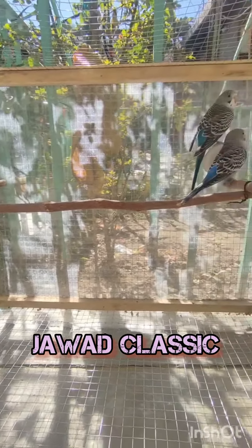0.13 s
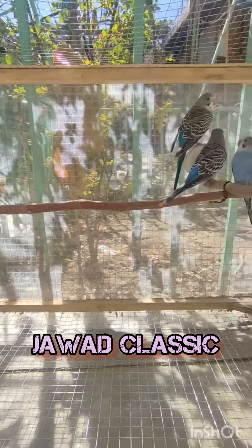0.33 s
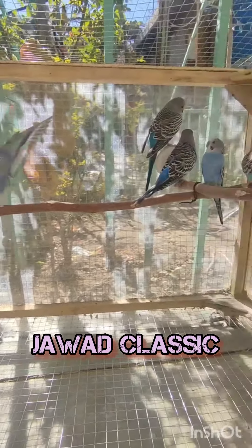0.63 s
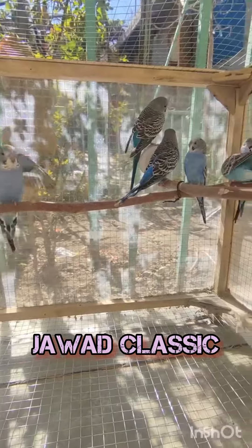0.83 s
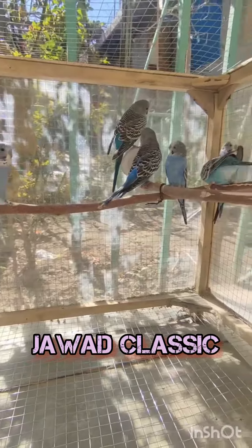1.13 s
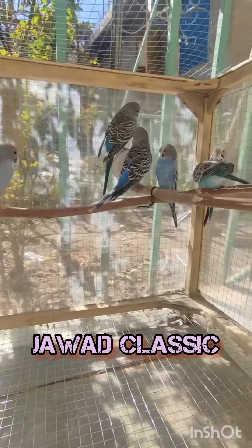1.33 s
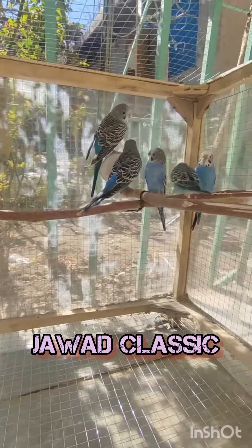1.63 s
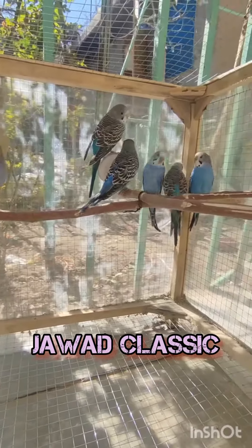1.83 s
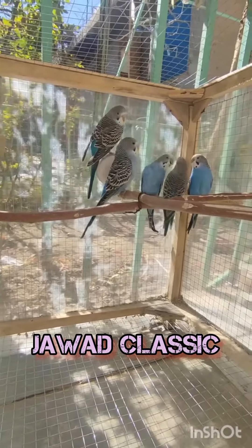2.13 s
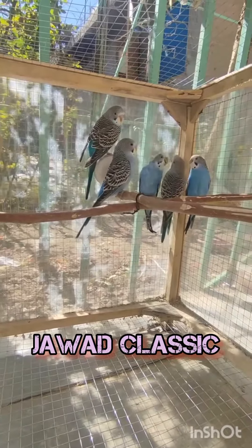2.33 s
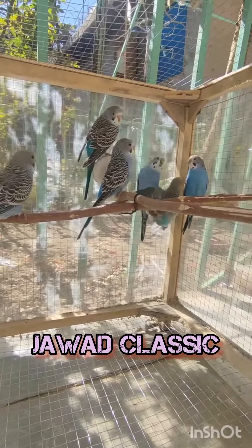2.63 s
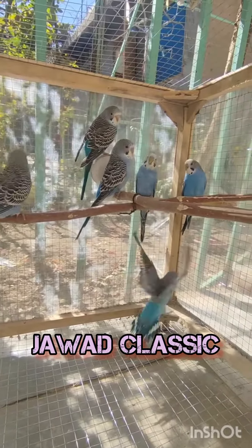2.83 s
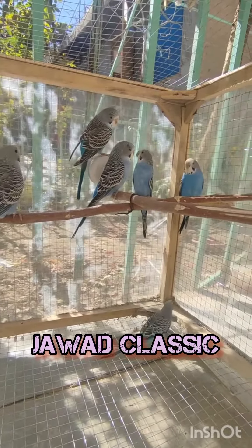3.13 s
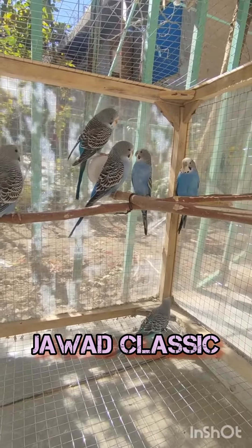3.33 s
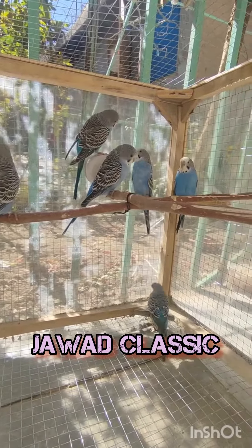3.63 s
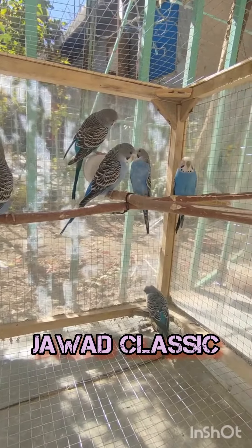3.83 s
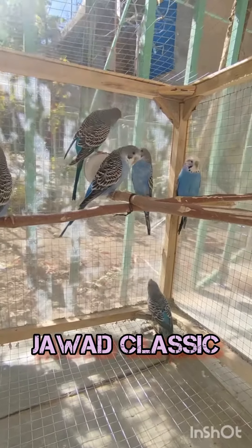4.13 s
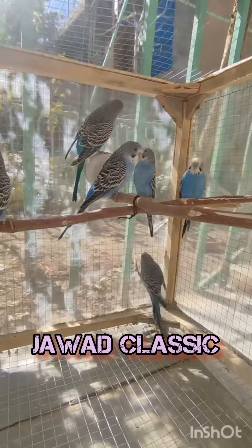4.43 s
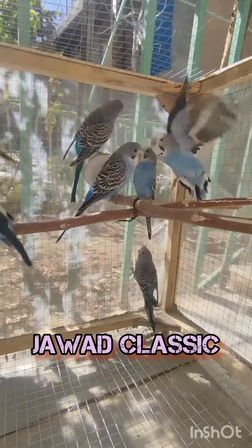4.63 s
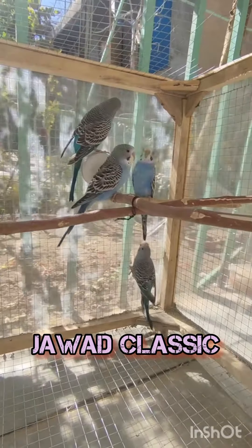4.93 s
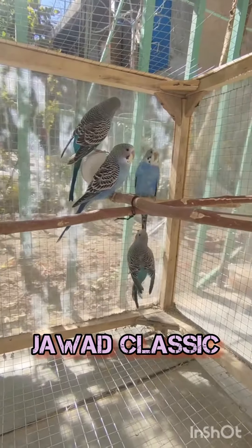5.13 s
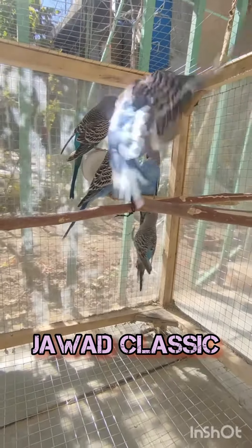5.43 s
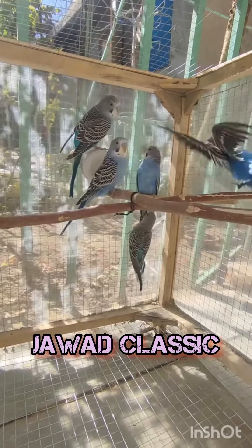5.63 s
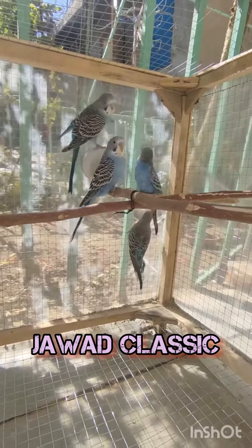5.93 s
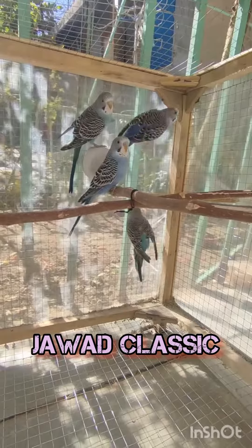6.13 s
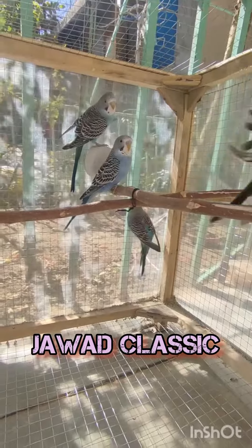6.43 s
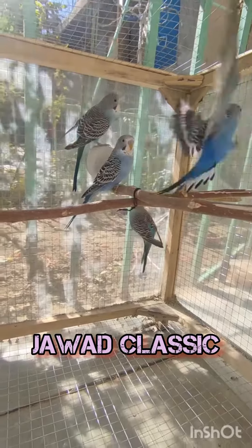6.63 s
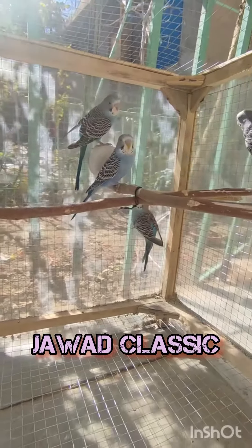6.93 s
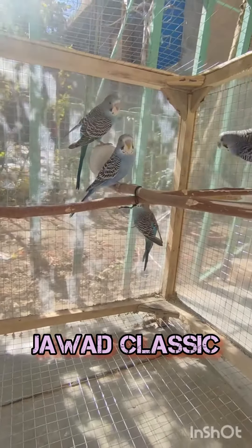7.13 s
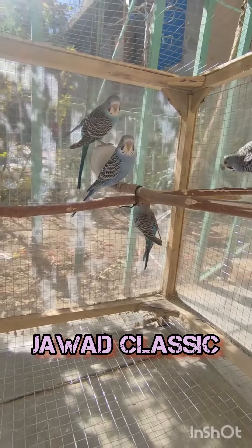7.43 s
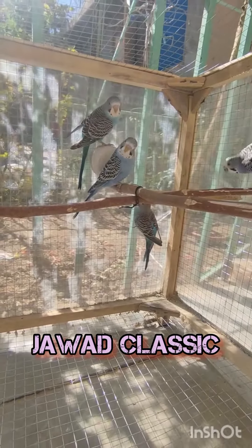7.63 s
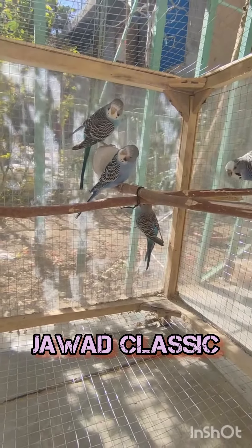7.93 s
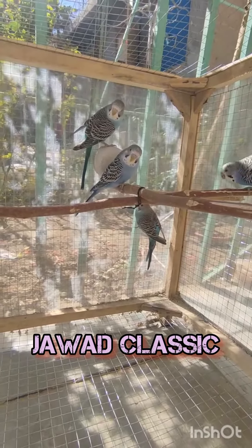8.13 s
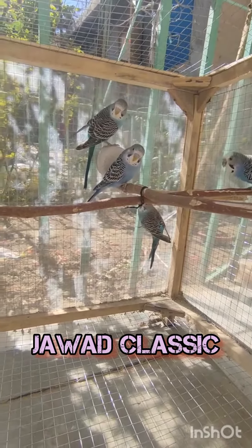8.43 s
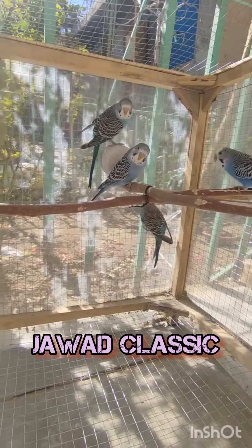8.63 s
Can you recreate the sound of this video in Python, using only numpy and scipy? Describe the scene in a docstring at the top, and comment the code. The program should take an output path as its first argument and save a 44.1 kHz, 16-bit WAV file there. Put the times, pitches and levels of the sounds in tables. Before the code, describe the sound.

Raspy squawks and quick rising chirps in a wire aviary give way to heavy wing flutter, buffeting thumps, mesh rattles and two faint bird whistles.

```python
"""Small parrots in an outdoor wire aviary, close to a phone with two microphones. Filtered noise and a 199 Hz
tone make a lasting hush and hum; bursts of crackle make claws and wings slap the mesh, at first sparsely.
Rasping squawks (pulsed resonances) and quick swept chirps (gliding tones) follow, then a dove's purring coos.
Wings and gusts then thump the microphones as smooth pulses amid gusty noise, strongest near 6 to 7 s.
A far bird gives two warbled whistles near the end, while feathers still rustle and the mesh rattles."""
import sys
import numpy as np
from scipy import signal
from scipy.fft import rfft, irfft, next_fast_len
from scipy.io import wavfile
from scipy.ndimage import uniform_filter1d, map_coordinates

SR = 44100
rng = np.random.default_rng(int(sys.argv[2]) if len(sys.argv) > 2 else 0)


def master(y):
    """Save y as 16-bit WAV."""
    cut = np.clip(np.atleast_2d(y).T, -1, 1)
    pcm = np.round(cut * 32767)  # scale
    wavfile.write(sys.argv[1], SR, pcm.astype(np.int16))


N = 386757

# Noise spectrum of low wing flutter. Each row: frequency in Hz, relative density in dB.
FLUTTER_SPECTRUM = [(120, -7), (200, -1.5), (253, -2), (286, -9), (430, -9), (588, -6.5), (1600, -13),
                    (2080, -52.5), (3520, -120)]
# Noise spectrum of coarse rustle and crackle. Each row: frequency in Hz, relative density in dB.
RUSTLE_SPECTRUM = [(710, -4), (1200, -8.5), (1410, -8.5), (1780, 0), (3430, -1), (4990, -4), (6460, -2.5),
                   (7260, 2), (8800, -17), (11400, -40.5), (19400, -120)]
# Noise spectrum of fine treble hiss. Each row: frequency in Hz, relative density in dB.
FINE_SPECTRUM = [(4940, -32.5), (8400, 2.5), (9690, -3), (11400, 2), (14600, 4), (15600, -4), (16000, -34)]
# Broad noise spectrum of a rasping voice. Each row: frequency in Hz, relative density in dB.
RASP_SPECTRUM = [(710, -79), (1200, -93.5), (1570, -26), (2880, -1), (3160, 1), (3940, 4.5), (5430, -8.5),
                 (5900, -33), (7480, 7.5), (9000, 3), (11700, -53), (19800, -120)]
VOICE_TOP_HZ = 8170


def amp(db):
    """Decibel law: the amplitude gain of a level in dB."""
    return 10 ** (np.asarray(db) / 20)


def unit(x):
    """Normalization of power: x scaled to rms 1."""
    return x / np.sqrt(np.mean(np.abs(x) ** 2) + 1e-20)


def along(points, hz):
    """Logarithmic frequency scale: (Hz, value) points interpolated on it."""
    f, v = np.transpose(points)
    return np.interp(np.log(hz + 1), np.log(f + 1), v)


def curves(rows):
    """Piecewise linear envelopes: one per column, sampled from the first row's time to the last."""
    s, *cols = np.transpose(rows)
    t = np.arange(s[0] * SR, s[-1] * SR) / SR
    return [np.interp(t, s, c) for c in cols]


def wobble(rate, size):
    """Band-limited random modulation: a smooth curve through rate Gaussian knots a second."""
    knots = rng.standard_normal(int(size * rate / SR) + 4)
    return map_coordinates(knots, [np.arange(size) * rate / SR])


def filtered(x, response):
    """Linear filtering: the spectrum of x times a response of frequency."""
    m = next_fast_len(x.shape[-1] + 4096)
    return irfft(rfft(x, m) * response(np.fft.rfftfreq(m, 1 / SR)), m)[..., :x.shape[-1]]


def coloured(x, spectrum):
    """Spectral shaping: x filtered by the given spectrum, at rms 1."""
    return unit(filtered(x, lambda hz: amp(along(spectrum, hz))))


def rush(spectrum, alike, patchy_db):
    """Partly coherent stereo noise: mid and side shares set the likeness of the ears; gain varies in patches."""
    z = signal.stft(rng.standard_normal((2, N + 512)), nperseg=512)[2]
    field = uniform_filter1d(rng.standard_normal(z.shape[1:]), 6, 0)
    field = unit(uniform_filter1d(field, 8, 1))
    pair = signal.istft(z * amp(patchy_db * field), nperseg=512)[1][:, :N]

    def mid_side(hz):
        turn = np.arccos(np.clip(along(alike, hz), -1, 1)) / 2
        return amp(along(spectrum, hz)) * [np.cos(turn), np.sin(turn)]

    mid, side = filtered(pair, mid_side)
    return unit(np.array([mid + side, mid - side]))


def add(out, s, x, pan_db, wet_db, t60, lag=8):
    """Interaural delay and scattering: the right side lags by samples; frame and ground scatter to each apart."""
    t = np.arange(SR // 5) / SR
    decay = amp(-60 * t / t60) + amp(-19.5 - 60 * t / 0.15)  # near mesh, then the yard
    paths = rng.standard_normal((2, len(t))) * decay
    paths *= amp(wet_db) / np.linalg.norm(paths, axis=1, keepdims=True)
    paths[[0, 1], [0, lag]] += 1  # direct sound
    sides = amp([pan_db / 2, -pan_db / 2])[:, None]
    ears = signal.fftconvolve(x[None], paths, axes=1) * sides
    seat = out[:, round(s * SR):][:, :ears.shape[1]]
    seat += ears[:, :seat.shape[1]]


def fade(size, edge):
    """Trapezoidal window: linear ends of edge seconds avoid clicks."""
    k = np.arange(size)
    return np.clip(np.minimum(k, size - k) / (edge * SR), 0, 1)


def ringing(pulses, hz, width_hz):
    """Resonance: two equal poles ring at each pulse, carried to a moving centre frequency, at rms 1."""
    decay = np.exp(-np.pi * width_hz / SR)
    swing = signal.lfilter([1], [1, -decay], pulses)
    swing = signal.lfilter([1], [1, -decay], swing)
    return unit(np.real(swing * np.exp(2j * np.pi * np.cumsum(hz) / SR)))


def background():
    """Diffuse field and steady tone: shaped outdoor noise with a slightly unsteady electric hum."""
    # Each row: frequency in Hz, relative density in dB.
    hush_spectrum = [(15, -31), (30, 1), (60, 2), (110, 3.5), (160, -1.5), (250, -9.5), (420, -17),
                     (800, -18), (1200, -26), (1940, -23.5), (4000, -24.5), (7500, -33), (9000, -48),
                     (13000, -34), (16000, -45.5)]
    # Each row: frequency in Hz, left-right likeness from -1 to 1.
    hush_alike = [(60, 1), (290, 1), (640, .5), (1400, 0.27), (9000, 0.053)]
    hum_hz, hum_db, hush_db = 199, -54, -56.5
    sway = wobble(4, N) / 3  # radians
    waver_db = wobble(5, N) * .7
    hum = amp(hum_db + waver_db) * np.sin(2 * np.pi * hum_hz * np.arange(N) / SR + sway)
    return hum + amp(hush_db) * rush(hush_spectrum, hush_alike, patchy_db=1.0)


def far_whistles():
    """Frequency modulation: two warbled whistles, each with a narrow noise band, blurred by distance."""
    # Two whistles. Each row: time in seconds, pitch in Hz, level in dB, warble depth in Hz.
    songs = [
        [(6.95, 1794, -47, 40), (6.99, 2010, -47, 34), (7.012, 2060, -44, 30), (7.03, 2380, -39, 30),
         (7.06, 2430, -40, 30), (7.09, 2375, -39, 20), (7.125, 2420, -43, 20), (7.145, 2400, -38, 30),
         (7.175, 2430, -43.5, 40), (7.2, 2420, -54, 40), (7.27, 2380, -62, 40)],
        [(7.6525, 1588, -64, 150), (7.7, 1656, -58, 170), (7.76, 1700, -53, 199), (7.8, 1697, -52, 190),
         (7.86, 1750, -52, 150), (7.92, 1910, -50, 50), (8.01, 1910, -56, 50)],
    ]
    warble_hz, tremble_hz = 33.3, 30  # rate of the warble; size of the random tremble
    out = np.zeros((2, N))
    for rows in songs:
        hz, db, depth_hz = curves(rows)
        size = len(hz)
        warble = depth_hz * np.sin(2 * np.pi * warble_hz * np.arange(size) / SR)
        hz = hz + warble + tremble_hz * wobble(200.0, size)
        tone = np.sin(2 * np.pi * np.cumsum(hz) / SR)
        tone += .7 * ringing(rng.standard_normal(size) + 0j, hz, 300)
        tone *= amp(db + 2.5 * wobble(90, size))
        add(out, rows[0][0], tone, 0, wet_db=-1.5, t60=.09)
    return out


def dove():
    """Amplitude modulation: a nearly pure tone, purring as its pitch rises and falls, makes each hollow coo."""
    # Each row: start in seconds, length in seconds, start pitch in Hz, top pitch in Hz, end pitch in Hz,
    # share of the length before the top, level in dB.
    notes = [(3.48, 0.053, 458, 493, 470, 0.41, -57), (3.708, 0.18, 501, 584, 502, 0.71, -50),
             (4.013, 0.14, 553, 632, 520, 0.63, -48), (4.28, 0.127, 547, 610, 508, 0.5, -47),
             (4.469, 0.082, 555, 562, 484, 0.62, -46.5)]
    purr_hz, purr_db = 22.7, 2.5
    out = np.zeros((2, N))
    for s, length, start_hz, top_hz, end_hz, peak, db in notes:
        top_s = np.clip(peak, .1, .9) * length
        [pitch] = curves([(0, start_hz), (top_s, top_hz), (length, end_hz)])
        size = len(pitch)
        pitch = pitch + 10 * wobble(50.0, size)
        purr = purr_db * np.cos(2 * np.pi * purr_hz * np.arange(size) / SR)
        note = amp(db + purr) * np.sin(2 * np.pi * np.cumsum(pitch) / SR)
        add(out, s, note * fade(size, edge=.006), 0, wet_db=-1, t60=.35)
    return out


def flight():
    """Turbulence and friction: stirred air and rustling feathers are noises throbbing with an uneven wing beat."""
    # Each row: frequency in Hz, relative density in dB.
    draught_spectrum = [(12, -23.5), (20, 10), (52, 1), (182, -13), (221, -28.5), (253, -33), (300, -26.5),
                        (390, -64), (660, -120)]
    # Air stirred at the phone. Each row: time in seconds, level in dB before a common 1 dB rise.
    draught_level = [(0, -63), (.61, -69), (.71, -58), (.8, -61), (1.3, -62), (2.5, -60.5), (2.75, -47),
                     (2.98, -46), (3.15, -52), (3.6, -61), (4.6, -63), (4.72, -37.5), (5.02, -34),
                     (5.12, -44.5), (5.3, -37.5), (5.56, -38.5), (5.66, -45), (5.9, -31.5), (6.04, -31),
                     (6.09, -25), (6.18, -29.5), (6.27, -37.5), (6.4, -29), (6.55, -29), (6.64, -33),
                     (6.8, -27.5), (6.95, -40), (7.07, -53), (8.77, -49.5)]
    # Low flutter of the wings. Each row: time in seconds, level in dB.
    flutter_level = [(0, -75), (.61, -69), (.72, -55), (.93, -61.5), (1.02, -74), (1.4, -67), (1.48, -54.5),
                     (1.56, -66.5), (2.5, -65.5), (2.73, -53), (2.91, -42.5), (3.1, -60.5), (3.4, -68),
                     (3.74, -62), (3.85, -59.5), (4.58, -64.5), (4.76, -47.5), (4.97, -46.5), (5.1, -47),
                     (5.16, -54), (5.25, -40.5), (5.42, -54), (5.68, -46.5), (5.88, -48), (5.94, -36),
                     (6.03, -41.5), (6.1, -35.5), (6.18, -37), (6.28, -47), (6.47, -36.5), (6.64, -45),
                     (6.71, -38.5), (7.0, -49), (7.12, -49), (7.3, -60.5), (7.79, -65), (7.94, -47),
                     (8.13, -53.5), (8.77, -64)]
    # How busy the feathers are. Each row: time in seconds, base level in dB, extra coarse rustle in dB.
    feathers = [(0, -87, 10.5), (.33, -84.5, 12), (.6, -73, 3), (.78, -73, 4.5), (.95, -78.5, 7),
                (1.0, -98, 2.5), (1.12, -76, -5), (1.34, -103, 9), (1.45, -75, 0), (1.5, -73.5, -1),
                (1.73, -69.5, 1), (2.02, -87, 4), (2.14, -72.5, 1), (2.35, -75.5, 2.5), (2.55, -75, -41),
                (2.62, -55, -2), (2.76, -57, -4.5), (2.81, -44.5, -6.5), (2.93, -48.5, -3.5),
                (3.03, -71, 3), (3.14, -78, 1.5), (3.28, -65.5, -8), (3.48, -77, 8.5), (3.72, -63, -2.5),
                (3.82, -80, 8), (4.35, -88, 12), (4.58, -66.5, -6), (4.78, -58.5, 1), (5.1, -62.5, 2),
                (5.16, -64, 3), (5.26, -55.5, -0.5), (5.55, -68, 1.5), (5.76, -52, -1.5),
                (5.86, -56.5, -0.5), (5.96, -47, -1), (6.15, -55, -1.5), (6.48, -50.5, 3.5),
                (6.64, -55.5, 3.5), (6.81, -65, 2.5), (7.0, -61.5, 1), (7.11, -54.5, -3.5), (7.18, -66, 6),
                (7.28, -74, 1), (7.75, -72.5, -3.5), (7.87, -76, 5), (7.907, -59, 10), (8.02, -52.5, 4),
                (8.1, -63, 1), (8.25, -73, 0.5), (8.6, -78.5, -4), (8.77, -91, -17.5)]
    tables = (draught_level, flutter_level, feathers)
    levels = [np.resize(c, N) for rows in tables for c in curves(rows)]
    draught_db, flutter_db, feather_db, coarse_db = levels

    beat_hz = 22.44 * amp(wobble(8.6, N))
    beat_db = 0.6 * np.sin(2 * np.pi * np.cumsum(beat_hz) / SR)
    throb = wobble(38, N) + 0.32 * beat_db
    flick = wobble(22, N) + 0.33 * beat_db

    # each microphone port meets its own eddies
    eddies = amp(beat_db + 0.8 * np.array([wobble(20, N), wobble(20, N)]))
    air = rush(draught_spectrum, [(40, 0.5), (200, 0.1)], patchy_db=-0.1)
    draught = amp(draught_db + 1.0) * unit(eddies * air)

    air = rush(FLUTTER_SPECTRUM, [(250, 0.65), (600, 0.93), (1300, -0.49)], patchy_db=2.0)
    flutter = amp(flutter_db) * unit(amp(1.7 * throb + 2.23 * wobble(150, N)) * air)

    # single feathers snap past each other, 22 a second on average
    snaps = (rng.random(N) < 22 / SR) * rng.exponential(0.2, N)
    snaps = signal.lfilter([1], [1, -np.exp(-1 / (0.0059 * SR))], snaps)
    grain = amp(1.5 * throb + 1.8 * flick + 0.4 * wobble(500, N)) * (1 + snaps)
    coarse = rush(RUSTLE_SPECTRUM, [(1500, -0.088), (5000, -0.035)], patchy_db=3.0)
    rustle = amp(feather_db + 11 + coarse_db) * unit(grain * coarse)
    fine = rush(FINE_SPECTRUM, [(1000, 0.035)], patchy_db=4.0)
    return draught + flutter + rustle + amp(feather_db + 4.5) * unit(grain * fine)


def thumps():
    """Pressure pulse: strong wing strokes and a turbulent gust near 6.1 s thump the microphones briefly."""
    # Each row: centre in seconds, level in dB, left minus right in dB, width in seconds (limited below).
    pushes = [(0.713, -30.5, 0, 0.0059), (1.475, -38.5, 15, 0.0034), (2.893, -24, -2, 0.0066),
              (4.712, -25, -0.5, 0.0082), (4.766, -24, 1.0, 0.0043), (4.816, -18, 6, 0.012),
              (4.953, -20.5, 3.0, 0.0027), (4.97, -30, 1.0, 0.0089), (5.01, -18, 0.5, 0.0051),
              (5.301, -25.5, 4, 0.006), (5.365, -20, 11, 0.0041), (5.429, -20.5, 17, 0.013),
              (5.48, -20.5, 7, 0.007), (5.528, -25, 3, 0.006), (5.878, -21.5, -6, 0.0043),
              (5.927, -17, 3, 0.0076), (5.9557, -22, 2, 0.0053), (5.9674, -14.5, 3.5, 0.0038),
              (6.047, -30, -2, .007), (6.066, -27, 20, .006), (6.0776, -25, -24, 0.0018),
              (6.091, -25, -16, 0.0036), (6.098, -24.5, -27, 0.0018), (6.1174, -19, 0, .011),
              (6.1281, -23, -25, 0.0022), (6.143, -22, -3, .008), (6.16, -23.5, -24, 0.0031),
              (6.1714, -31, -20, .004), (6.1803, -27, -25, 0.0012), (6.419, -11.5, 3, 0.0039),
              (6.465, -10.5, 0, 0.0052), (6.57, -22, 5, 0.0079), (6.675, -15, 4, 0.0077),
              (6.712, -16, 6, 0.0055), (6.821, -18, 8, 0.0078), (6.864, -21, 11, 0.0089),
              (6.948, -25, 4, 0.006), (7.006, -26, 2, 0.0053)]
    out = np.zeros((2, N))
    for s, db, pan_db, width in pushes:
        u = np.arange(-2000, 2000) / (SR * np.clip(width, .002, .012))
        # one main swing, with a shallow swing back on either side
        push = np.exp(-2.8 * u * u) - 0.19 * np.exp(-.3 * u * u)
        sides = amp([db + pan_db / 2, db - pan_db / 2])
        out[:, round(s * SR) - 2000:][:, :4000] -= np.outer(sides, push)
    return out


def spray(size, top_db, thud_db):
    """Superposition of noise bands: gritty crackle at rms 1 with its treble and its dull thud."""
    grit = rng.standard_normal((3, size)) * amp(2.5 * wobble(900, size))
    crackle = coloured(grit[0], RUSTLE_SPECTRUM)
    treble = amp(top_db) * coloured(grit[1], FINE_SPECTRUM)
    return crackle + treble + amp(thud_db) * coloured(grit[2], FLUTTER_SPECTRUM)


def soft_bursts():
    """Gaussian envelope: each makes a soft burst, mostly a wing beat's swish, at 6.72 s the body of a knock."""
    # Each row: peak time in seconds, level in dB, half width in seconds, treble in dB, thud in dB.
    bursts = [(2.8, -38.5, 0.011, -6, -11), (4.751, -44.5, 0.0043, -6, -14), (4.955, -44, 0.0052, -6.5, 1),
              (5.417, -45.5, 0.0047, -3, -8), (5.467, -42.5, 0.0078, -4, -4),
              (5.514, -47.5, 0.0062, -8, -3), (5.738, -38, 0.0037, -6, -8), (5.853, -48, 0.0048, -10, 4),
              (5.968, -33.5, 0.0036, -5, -14), (6.125, -38.5, 0.004, -3, 0), (6.21, -41.5, .007, -5, -5),
              (6.3, -41, 0.0053, -8.5, -2), (6.346, -39, 0.005, -7, -8), (6.416, -39, 0.0074, -7, -1.5),
              (6.46, -38.5, 0.0067, -7, 5), (6.72, -30, .005, -4, -6), (7.092, -47, 0.01, -4.5, -2),
              (7.815, -57, 0.01, -4.5, -17), (8.06, -51, 0.0099, 1, -16), (8.502, -58.5, 0.016, -6.5, 0.5)]
    out, t = np.zeros((2, N)), np.arange(SR // 5) / SR
    for s, db, width, top_db, thud_db in bursts:
        shape = np.exp(-((t - .05) / width) ** 2)
        burst = amp(db) * shape * spray(len(t), top_db, thud_db)
        add(out, s - .05, burst, 0, wet_db=1.5, t60=.017, lag=rng.integers(10))
    return out


def taps():
    """Impact and decay: claws and wing tips give a crack and a spray of wire crackle over a dull frame thud."""
    # Each row: time in seconds, level in dB before a common 6 dB cut, 60 dB decay time in seconds
    # (limited below for the spray), thud in dB, treble in dB, left minus right in dB.
    knocks = [(0.6999, -52.5, 0.022, 5, -13, -6), (0.9174, -51, 0.018, 2, -9, -2),
              (0.9724, -51.5, 0.15, -22, -25, -2), (1.114, -62, 0.041, -12, -13, 1),
              (1.4797, -64, 0.022, 13, -22, -26), (1.521, -60.5, 0.0082, 5.5, -5, 28.5),
              (2.356, -53.5, 0.052, -5, -24, -12), (2.523, -49.5, 0.08, -21, -5.5, 2),
              (2.5876, -50, 0.02, -24, -6, 4), (2.608, -37.5, 0.0099, -10, -10, -1),
              (2.656, -36, 0.022, -12, -4, 0), (3.125, -48, 0.01, -10, -13, 3),
              (3.187, -46.5, 0.2, -25, -2.5, 2), (3.292, -54, 0.03, -22, 5, 2),
              (4.688, -33.5, 0.04, -19, -8.5, -3), (4.789, -33.5, 0.011, -8, 0, 0.5),
              (4.898, -28.5, 0.074, -23, -3, 0.5), (5.001, -47, 0.01, 13.5, -15, -2),
              (5.0791, -32.5, 0.15, -1.5, -7, -4.5), (5.1879, -36.5, 0.15, -2, -2, -6),
              (5.249, -26, 0.021, -6, -7, -1), (5.3168, -42, 0.021, -3, -6, -22.5),
              (5.6088, -34.5, 0.084, -6.5, -9, -2), (5.9252, -35, 0.03, 3, -6, 5),
              (5.937, -45, 0.03, 10, -6, -2), (5.988, -50, 0.044, 16, -6, -5),
              (6.436, -28.5, 0.057, -10, -4, -4.5), (6.5033, -35, 0.17, 4, -4, -2),
              (6.5595, -28, 0.11, -3, -8.5, 2), (6.672, -29.5, 0.17, -4.5, -3, -2),
              (6.715, -21.5, 0.038, -14, -7, 5), (6.745, -25, 0.033, -13, -2.5, -2),
              (6.797, -39.5, 0.091, -6, -4, 1), (6.8429, -25.5, 0.013, -31, -5, 1),
              (6.8966, -32.5, 0.019, -2.5, -4.5, -3), (6.9468, -30.5, 0.02, -0.5, -5, -2),
              (7.3116, -40, 0.15, -8, -4, -1), (7.4248, -41.5, 0.17, -0.5, -8.5, 0),
              (7.6159, -47, 0.18, -0.5, -12, -1.5), (7.83, -40, 0.14, -16, -5.5, -2),
              (7.9387, -38.5, 0.048, -26, -12, -7), (8.019, -45.5, 0.17, -10, 0, -9),
              (8.2954, -45, 0.29, 0.5, -1, 0), (8.341, -50.5, 0.13, -4, 1, -6.5),
              (8.5194, -49.5, 0.13, -4.5, 2, -2.5)]
    crack_s = .003  # time to the peak of the crack
    out, t = np.zeros((2, N)), np.arange(SR // 5) / SR
    for s, db, t60, thud_db, top_db, pan_db in knocks:
        u = t / np.clip(t60, .01, .2)
        tail = amp(-60 * u) * (1 - np.exp(-30 * u))
        crack_db = -1.5 - 64 * t60  # a longer spray starts with a weaker crack
        crack = amp(crack_db) * (t / crack_s * np.exp(1 - t / crack_s)) ** 2
        tap = amp(db - 6) * (tail + crack) * spray(len(t), top_db, thud_db)
        # each has its own delay to the right microphone
        add(out, s - crack_s / 2, tap, pan_db, wet_db=1.5, t60=.022, lag=rng.integers(10))
    return out


def chirps():
    """Frequency glide with harmonics: a trembling whistle sweeps under flickering overtones."""
    # Each row: start in seconds, length in seconds, start pitch in Hz, end pitch in Hz, level in dB,
    # share of the length before the peak, overtone strength in dB (scaled by pitch and order),
    # exponent of the shoulders, exponent of the glide (higher levels out earlier).
    glides = [(1.285, 0.011, 4040, 4050, -43, 0.3, -8, 1, 1.8),
              (1.29, 0.058, 3030, 2256, -43, 0.2, -19, 5.6, 1.4),
              (1.342, 0.025, 3980, 4150, -38, .4, -20, 1.7, 2.1),
              (1.366, 0.069, 3280, 2240, -46, 0.27, -15, 3, 1.2),
              (1.416, 0.035, 4050, 4180, -41.5, 0.54, 2, 1.5, 1.5),
              (1.407, 0.11, 3056, 2930, -46, .2, -8, 2.5, 0.93),
              (1.558, 0.04, 3860, 2750, -41, 0.15, -7, 1.8, 1.1),
              (1.62, .016, 3610, 3700, -40, .5, -8, 2.5, 1),
              (1.648, 0.022, 2820, 2590, -42, 0.25, -11, 3.4, 1.25),
              (1.724, 0.042, 4900, 3500, -34.5, 0.52, 4.5, 0.77, 1.8),
              (1.795, 0.022, 890, 3665, -30, 0.61, -12, 1.15, 1.83),
              (1.885, 0.0198, 2630, 3540, -33.5, 0.67, -6, 2.3, 1.9),
              (1.959, 0.028, 785, 3920, -26, 0.63, -10.5, 1.94, 2.05),
              (2.056, 0.032, 773, 3740, -29, 0.55, -10, 2, 1.9),
              (2.151, 0.041, 800, 3460, -35, 0.55, -14, 1.4, 2.4),
              (2.244, 0.036, 810, 3580, -31.5, 0.78, -15.5, 1.3, 1.61),
              (2.482, .024, 900, 3410, -33, 0.64, -18, 1.3, 1.5),
              (2.624, 0.022, 2200, 3440, -40.5, 0.39, -21, 3, 1.2),
              (4.242, 0.023, 1440, 3730, -47, 0.86, -11, 3, 1.1),
              (4.543, 0.048, 2296, 2400, -41, 0.33, -10, 3.9, 1.4),
              (4.575, 0.054, 3520, 3450, -49, 0.18, -6, 2.5, 1.1),
              (4.608, 0.022, 2240, 2420, -51, .6, -11, 2.5, 1.1),
              (4.629, 0.014, 2900, 2950, -48, .47, -7, 2.1, 1.1),
              (4.651, .011, 4840, 4650, -40, 0.48, -20, 1.7, 1.2)]
    start_db, end_db = -31, -25.5  # level at either end, under the peak
    pop_db, pop_s = -18, 0.00081  # low opening pop: level under the peak, half width
    rasp_spectrum = [*RASP_SPECTRUM[:9], (VOICE_TOP_HZ, -40)]
    out = np.zeros((2, N))
    for s, length, start_hz, end_hz, db, peak, over_db, shoulder, bend in glides:
        [away] = curves([(0, -1), (np.clip(peak, .05, .95) * length, 0), (length, 1)])
        shape_db = np.where(away < 0, start_db, end_db) * np.abs(away) ** shoulder
        size = len(shape_db)
        hz = end_hz + (start_hz - end_hz) * np.linspace(1, 0, size) ** bend
        phase = 2 * np.pi * np.cumsum(hz + 90 * wobble(457, size)) / SR
        tone = np.sin(phase) * amp(0.14 * wobble(590, size))
        # the second voice side beats at 240 Hz
        tone *= 1 + .55 * np.sin(2 * np.pi * (240 * np.arange(size) / SR + rng.random()))
        tone += .27 * ringing(rng.standard_normal(size) + 0j, hz, 900)  # breath around the whistle
        rasp = coloured(rng.standard_normal(size), rasp_spectrum)
        rasp += 0.19 * coloured(rng.standard_normal(size), FINE_SPECTRUM)
        tone += amp(-21.5 - 0.29 * shape_db) * rasp  # falls and rises less than the whistle
        for k in range(2, 8):
            # overtones fade above about 8.3 kHz, where the microphone's response drops
            reach = 1 / (1 + (k * hz / 8300) ** 24)
            strength_db = over_db * (hz / 2500) ** 0.67 * (k / 2) ** 0.21
            strength_db = strength_db - 2.5 * (k - 1.5) + 5 * wobble(250, size)
            tone += reach * amp(strength_db) * np.sin(k * phase)
        # only a glide that starts low opens with a pop
        pop = (start_hz < 1000) * amp(pop_db) * np.exp(-(np.arange(size) / (pop_s * SR) - 1) ** 2)
        chirp = amp(db) * (amp(shape_db) + pop) * tone
        add(out, s, chirp * fade(size, edge=0.00051), 0, wet_db=2, t60=0.024)
    return out


def squawks():
    """Source and filter: uneven slams of the syrinx and breath ring a chest band and four wavering throat bands."""
    # Each row: time halfway up the rise in seconds, half the rise, the hold and half the fall in seconds,
    # chest band in dB, then level in dB and centre in Hz of four throat bands from low to high,
    # left minus right in dB, mean slams a second, then the gain in dB of each throat band from start to end.
    calls = [(1.288, 0.00097, 0.033, 0.026, -80, -46, 2500, -52, 4290, -53.5, 6160, -46.5, 7220, 1, 258, -3, 1, 1, 14),
             (1.347, .003, 0.018, .006, -80, -43, 2900, -47, 4130, -51, 6330, -40.5, 7500, -1, 262, 3, 3, 1, 3),
             (1.367, 0.0043, 0.061, 0.016, -83, -37.5, 2794, -43, 4130, -48, 6330, -41, 7500, 2.5, 260, -20, -5, -1, -13),
             (1.455, 0.011, 0.022, 0.031, -71, -56, 2920, -56, 3670, -69, 5948, -62, 7800, 8, 258, -3, -1, -1, -1),
             (1.545, 0.0027, .005, .006, -46, -45, 2880, -52, 3900, -52, 6370, -47, 7700, 1, 262, 3, 1, 1, 1),
             (1.588, 0.0088, 0.062, 0.0043, -72, -45.5, 2570, -47.5, 3710, -59, 6500, -50.5, 7540, -1.5, 237.6, -14, 13, -1, 19),
             (1.651, 0.0018, 0.0044, 0.0062, -80, -42, 2885, -42, 3770, -58, 6550, -49, 7640, 0, 259, 0, 0, 0, 0),
             (1.76, 0.0084, 0.019, 0.0064, -81, -46.5, 2570, -52, 3680, -70, 5958, -56, 7600, 3.5, 265, -2, 1, 1, 1),
             (1.793, 0.005, 0.0078, 0.011, -77, -40.5, 3080, -58, 3542, -48, 5930, -36.5, 8040, 4, 262, -2, 1, 1, 4),
             (1.851, 0.0027, 0.011, .01, -78, -43, 2660, -47, 3700, -62, 6400, -49, 7500, 1, 263, -1, 1, 1, 1),
             (1.872, 0.0052, 0.023, 0.012, -78, -37, 2610, -45, 3540, -49, 6580, -48, 7360, 0.5, 267, 5, -2, 3, 1),
             (2.684, 0.008, 0.038, 0.011, -62, -38, 2824, -39, 4400, -25.5, 6080, -30.5, 6960, -0.5, 169.8, -1, -6.5, -6.5, -2),
             (2.814, 0.006, 0.061, 0.009, -69, -49, 2750, -37, 4160, -25, 6350, -23.5, 6970, 0.2, 229.3, 1, 3, -13, 0),
             (3.6, 0.0057, 0.02, .01, -45, -33, 2975, -37.5, 4370, -32.5, 6070, -34, 8070, 1.5, 255.5, 3, 1, 12, -9),
             (3.745, .008, 0.0076, .02, -80, -65, 2600, -51, 3960, -70, 5940, -75, 7500, 2, 260, 1, 5, 1, 6),
             (3.865, 0.0085, .016, .006, -80, -57, 2580, -54, 3860, -74, 5900, -67, 7560, -5, 255, 1, 8, 1, -1),
             (3.897, .009, 0.033, 0.017, -45.5, -35.5, 2710, -33.5, 4460, -29, 5900, -33, 7460, -1.5, 262, -1, 1, 8, 0),
             (4.082, 0.001, 0.049, .016, -40, -32, 2860, -28.5, 3860, -29, 5900, -32.5, 7000, -3, 202, 4, 4, 8, -6),
             (4.263, 0.0055, 0.03, 0.011, -45.5, -41, 2680, -40.5, 4180, -43, 5720, -43.5, 7000, -3, 258.7, -1, 1, -5, -1),
             (4.401, 0.00088, 0.0085, 0.0084, -46, -32.5, 2890, -34, 3620, -36, 5770, -36, 8300, -0.5, 254, -13, 0.5, -6, 2),
             (4.422, 0.0066, 0.02, 0.011, -42.5, -31.5, 2640, -26.5, 3686, -37, 5660, -33.5, 6640, -0.5, 223.4, -10, 5, -3, 1),
             (4.473, 0.0068, 0.016, 0.01, -74, -36.5, 2550, -42, 3890, -38.5, 5700, -46, 6660, -4, 271, 1, 1, 1, -1),
             (4.521, 0.0024, 0.014, 0.021, -78, -41, 2510, -41, 4280, -47, 5430, -45.5, 6620, -4, 261.7, -7, 1, -4, 4),
             (4.651, 0.0032, 0.017, 0.0087, -49.5, -40.5, 2490, -46.5, 4700, -63, 5660, -49, 7000, -4, 259.5, -5, -4, 1, 7)]
    # Widths in Hz of the four throat bands, from low to high.
    throat_width_hz = (560, 480, 420, 520)
    chest_hz, chest_width_hz, voice_low_hz = 1576, 780, 1480
    halfway_db, hiss_db = -12, -12  # level halfway up the rise; hiss relative to the top band
    buzz_hz, buzz_depth = 620, .5  # second voice, which ribs every band with side bands
    out = np.zeros((2, N))
    for s, rise, hold, fall, chest_db, *cols in calls:
        bands, (pan_db, slam_hz), gains_db = cols[:8], cols[8:10], cols[10:]
        top = 2 * rise + hold
        [away] = curves([(0, 2), (2 * rise, 0), (top, 0), (top + 2 * fall, 2)])
        shape_db = halfway_db * away ** .9
        size = len(shape_db)

        beat = np.cumsum(slam_hz * amp(2.5 * wobble(110, size))) / SR
        slams = 5.5 * np.diff(np.floor(beat), prepend=0) * amp(1.5 * rng.standard_normal(size))
        # the air jet swells quickly and dies after each slam, over a steady share that grows
        jet = np.linspace(.08, .4, size) + uniform_filter1d(np.exp(-3.2 * (beat % 1)), size=36)
        rasp = coloured(.3 * slams + jet * rng.standard_normal(size), RASP_SPECTRUM)
        voice = amp(max(bands[::2]) - 1.5) * rasp
        buzz_phase = 2 * np.pi * np.cumsum(buzz_hz * amp(.5 * wobble(25, size))) / SR
        buzz = unit(1 + buzz_depth * np.cos(buzz_phase))

        resonances = zip([0, *gains_db], [chest_db, *bands[::2]], [chest_hz, *bands[1::2]],
                         [chest_width_hz, *throat_width_hz])
        for gain_db, db, hz, width_hz in resonances:
            # the constant .075 is the pitched core of the band
            breath = .075 + rng.standard_normal(size) + 1j * rng.standard_normal(size)
            drive = slams * amp(4.4 * rng.standard_normal(size)) + jet * breath
            level_db = db + gain_db * np.linspace(-.5, .5, size) + 2 * wobble(60, size)
            voice += amp(level_db) * buzz * ringing(drive, hz * amp(.15 * wobble(50, size)), width_hz)

        def voice_band(hz):
            return 1 / (1 + (hz / VOICE_TOP_HZ) ** 40) / (1 + (voice_low_hz / (hz + 1)) ** 12)

        voice = filtered(voice, voice_band)
        voice += amp(hiss_db + bands[-2]) * coloured(jet * rng.standard_normal(size), FINE_SPECTRUM)
        call = amp(shape_db) * voice * fade(size, edge=.0015)
        add(out, s - rise, call, pan_db, wet_db=-4, t60=.012)
    return out


def scene():
    """Linear superposition: all sources add together."""
    far = background() + far_whistles() + dove()
    wings = flight() + thumps() + soft_bursts() + taps()
    return far + wings + chirps() + squawks()


def record(dry):
    """Band limitation: the phone rolls off the deepest bass and keeps nothing from 15950 Hz up."""
    return filtered(dry, lambda hz: (hz < 15950) * hz ** 2 / (hz ** 2 + 18 ** 2))


dry = scene()
out = record(dry)
master(out)
```